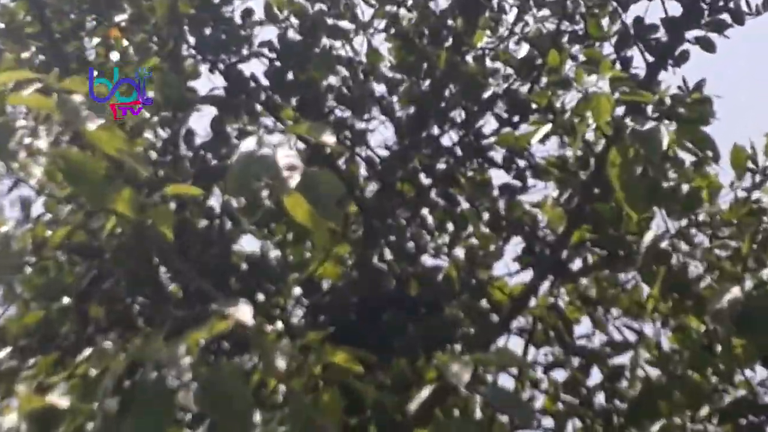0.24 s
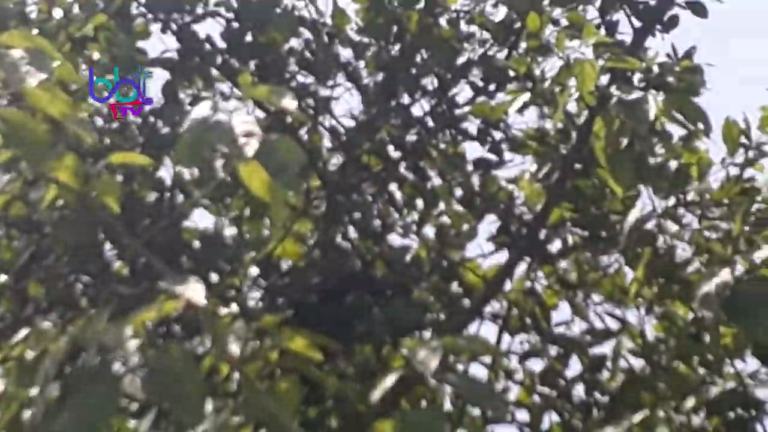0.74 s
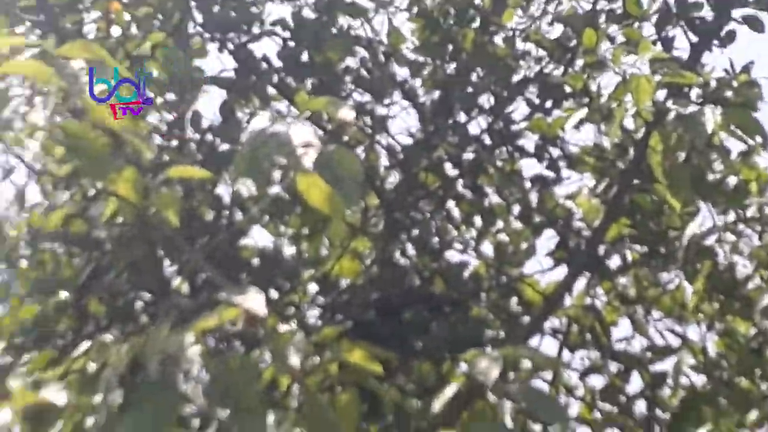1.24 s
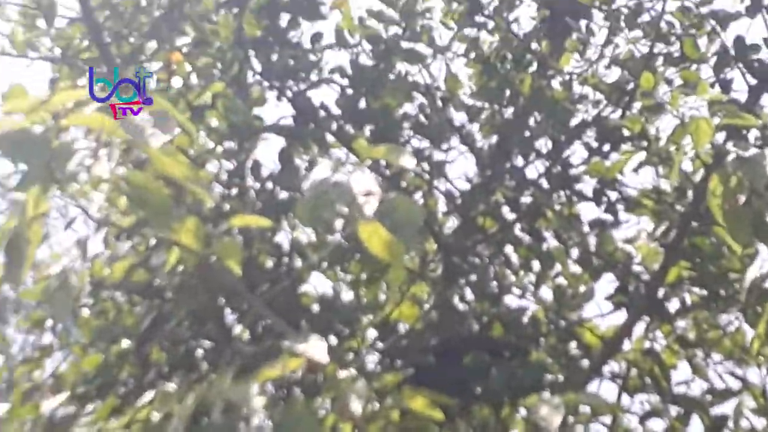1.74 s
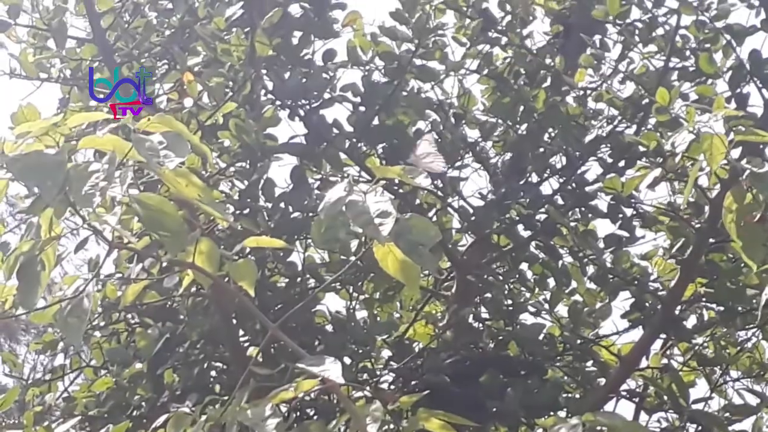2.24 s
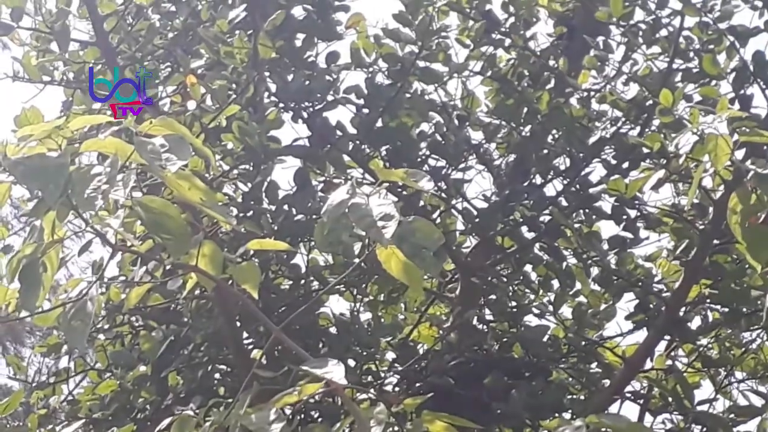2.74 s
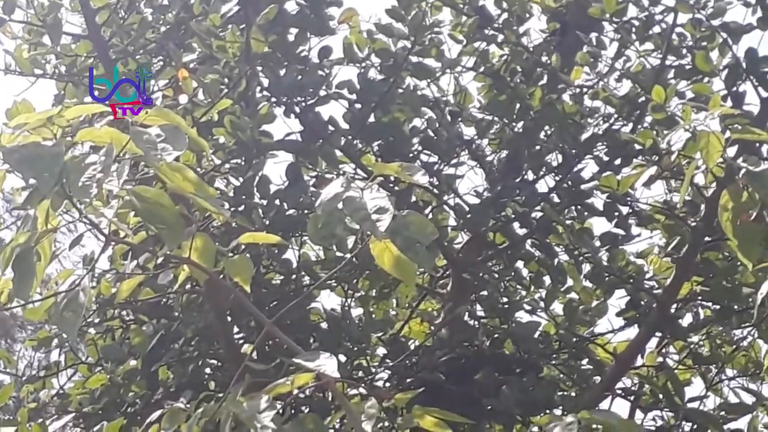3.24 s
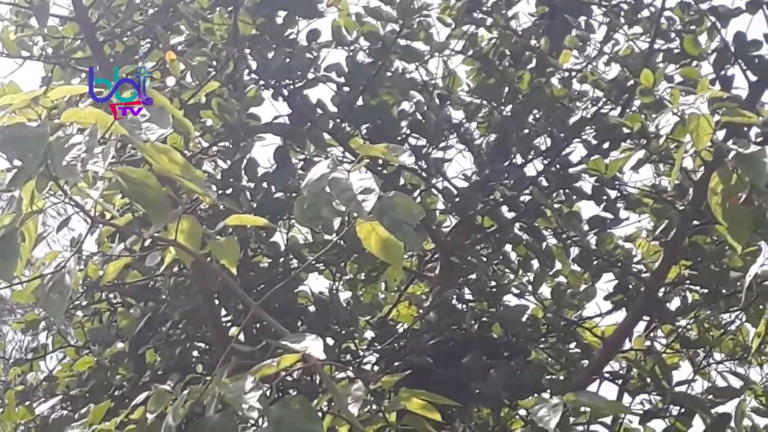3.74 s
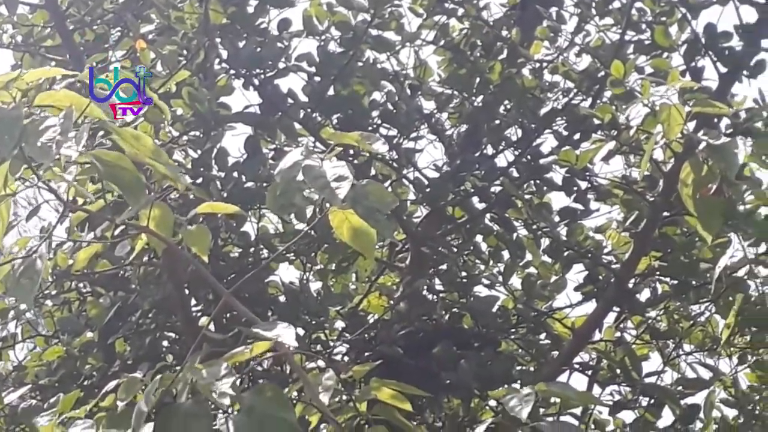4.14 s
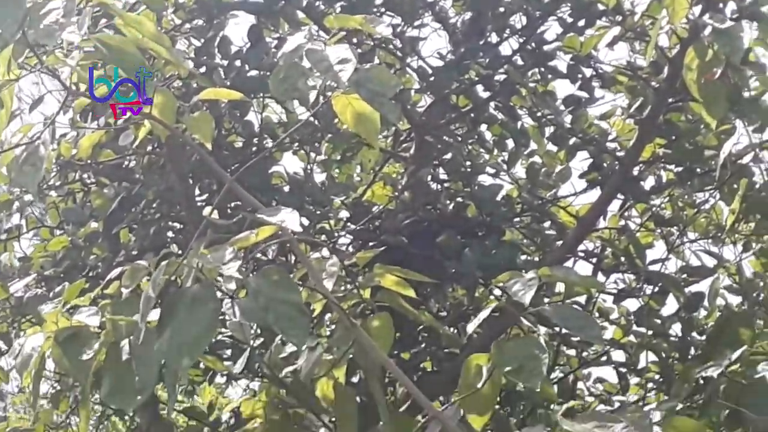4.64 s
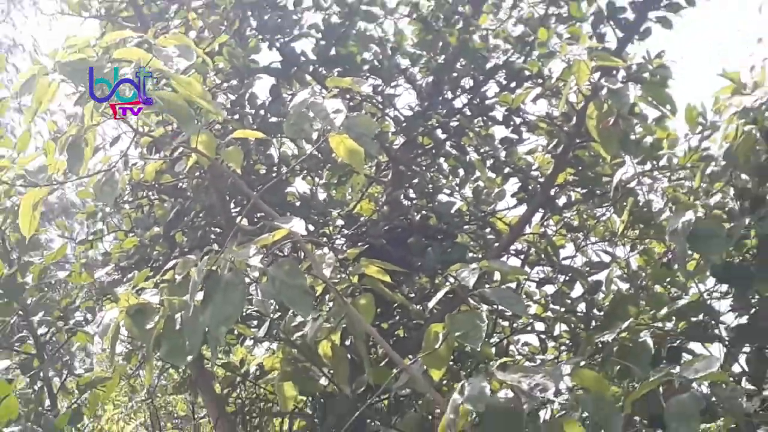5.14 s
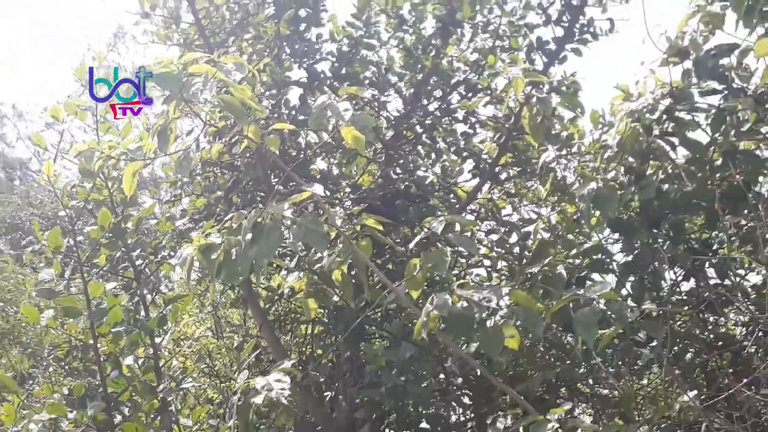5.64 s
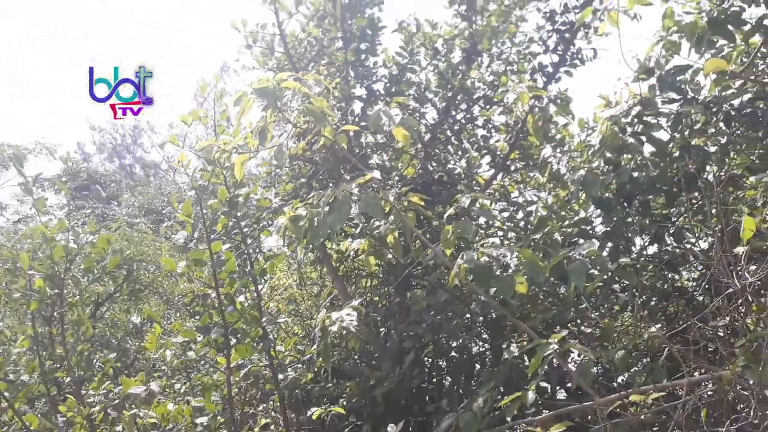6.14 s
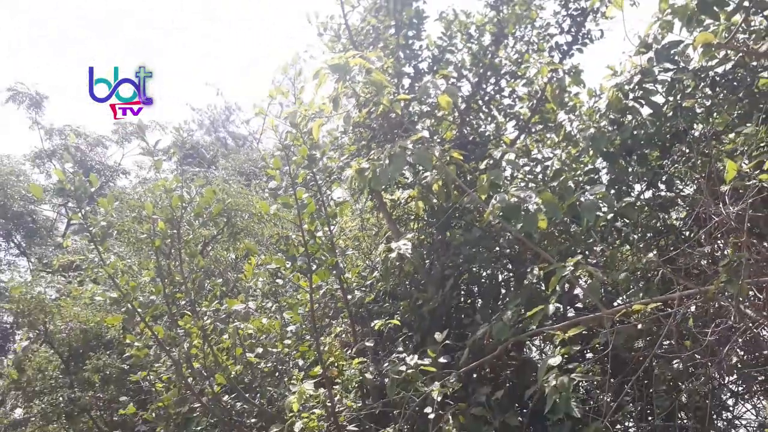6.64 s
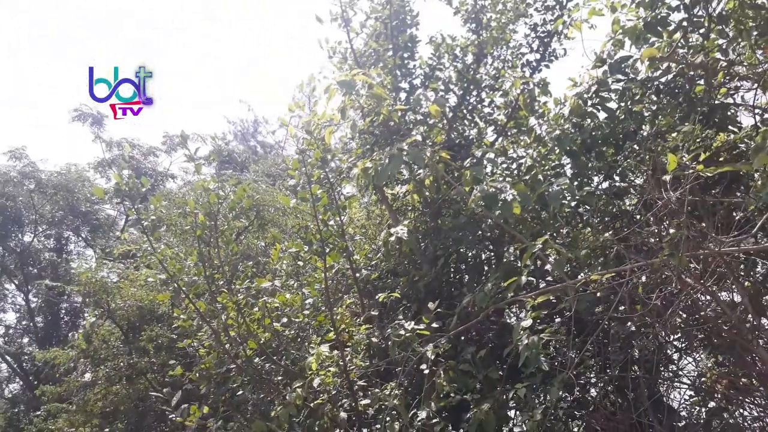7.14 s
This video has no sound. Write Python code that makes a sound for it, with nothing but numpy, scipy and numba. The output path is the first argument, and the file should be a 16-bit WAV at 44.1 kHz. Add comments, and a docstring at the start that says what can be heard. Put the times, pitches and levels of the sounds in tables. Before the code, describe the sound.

Outdoors among trees, one fairly close bird scolds in rasping bursts of about a quarter second: four calls, a gap, three more, a gap, two, then a last one. Leaves and trunks add a short, diffuse echo. Faint dry chacks, a thin throbbing insect and hoarse distant birds fill the gaps. Near the end, fingers fumble on the hard body of the microphone device, with one very loud, sharp clack.

```python
"""Scolding shrike in a tree

A shrike gives ten rasping calls in short runs: a buzzing voice shaped by throat, mouth, windpipe and beak.
Trees and a far slope answer as a noise tail and a smeared echo. Chacks, hoarse far birds and insects
are shaped noise and tones; rumble and leaf hiss are bands of noise that swell.
A hand shifts on a hard shell: knocks ring it, and rubbing is a crowd of tiny knocks."""
import sys
import numpy as np
from scipy import signal
from scipy.io import wavfile
from scipy.ndimage import uniform_filter1d
from numba import njit

SR = 44100
rng = np.random.default_rng(int(sys.argv[2]) if len(sys.argv) > 2 else 0)


def generate_wav(sig):
    """Save sig (samples, or channels by samples) to the path in sys.argv[1] as 16-bit PCM at SR."""
    pcm = np.round(np.clip(np.atleast_2d(sig).T, -1, 1) * 32767).astype(np.int16)
    wavfile.write(sys.argv[1], SR, pcm)


N = 326781


def amp(db):
    """Gain of a level in dB."""
    return 10 ** (np.asarray(db) / 20)


def rms_one(x):
    """Scale a sound to an average strength (rms) of 1."""
    return x / np.sqrt(np.mean(x ** 2) + 1e-20)


def in_time(rows):
    """Turn table columns into curves over all samples; the first column is the time in seconds."""
    time_s, *columns = np.transpose(rows)
    return [np.interp(np.arange(N) / SR, time_s, column) for column in columns]


def sounding(tables, fade_s=0.012):
    """A gate: 1 between the first and last time of each table, with short fades, else 0."""
    t = np.arange(N) / SR
    gate = 0
    for rows in tables:
        inside_s = np.minimum(t - rows[0][0], rows[-1][0] - t)
        gate = gate + np.clip(inside_s / fade_s + 1, 0, 1)
    return gate


def wander(rate_hz):
    """A random wobble of spread 1: noise smoothed twice by a one-pole low-pass."""
    r = np.exp(-2 * np.pi * rate_hz / SR)
    noise = rng.standard_normal(N + SR)
    return rms_one(signal.lfilter([1], [1, -2 * r, r * r], noise)[SR:])  # skip the filter's start


def band(x, lo_hz, hi_hz):
    """Keep the sound between two frequencies (Butterworth band-pass)."""
    return signal.sosfilt(signal.butter(2, [lo_hz, hi_hz], "band", fs=SR, output="sos"), x)


@njit
def resonate(x, turn, r):
    """Two-pole resonance, gain 1 on top; its centre (radians per sample) may move."""
    y = np.zeros(len(x))
    for i in range(2, len(x)):
        drive = (1 - r * r) / 2 * (x[i] - x[i - 2])
        y[i] = drive + 2 * r * np.cos(turn[i]) * y[i - 1] - r * r * y[i - 2]
    return y


def peak(x, hz, width_hz):
    """Resonance at hz, a number or a curve."""
    turn = 2 * np.pi * hz / SR * np.ones(N)
    return resonate(x + 1e-18, turn, np.exp(-np.pi * width_hz / SR))


def tract(x, modes, scale=1):
    """Side-by-side resonances, each passed twice to be steep; scale turns the first column into Hz."""
    out = 0
    for place, width_hz, level_db in modes:
        hz = scale * place
        out = out + amp(level_db) * peak(peak(x, hz, width_hz), hz, width_hz)
    return out


def scold_rows(start_s, length_s, crest_db, swell_db, half_db, open_hz, crest_hz, *beak):
    """One call as rows (time s, level dB, throat Hz, climb 0-1, beak columns): it opens, swells, breaks off."""
    open_s, open_db = 0.019, 9.5  # opens this fast, from this far below
    break_s, break_db, break_treble_db = 0.019, 16.5, 12  # the voice breaks off; its treble drops less
    fade_s, fade_db = 0.021, 6.5  # then it fades
    crest_s = start_s + length_s
    opened_s, opened_climb = start_s + open_s, open_s / length_s
    half_s, half_hz = (opened_s + crest_s) / 2, (open_hz + crest_hz) / 2
    broken = (*beak[:-1], beak[-1] + break_treble_db)
    return [(start_s, crest_db - swell_db - open_db, open_hz, 0, *beak),
            (opened_s, crest_db - swell_db, open_hz, opened_climb, *beak),
            (half_s, crest_db - half_db, half_hz, (1 + opened_climb) / 2, *beak),
            (crest_s, crest_db, crest_hz, 1, *beak),
            (crest_s + break_s, crest_db - break_db, crest_hz, 1, *broken),
            (crest_s + break_s + fade_s, crest_db - break_db - fade_db, crest_hz, 1, *broken)]


def shrike():
    """A pulsing voice near 900 Hz whose pitch and strength swing about 110 times a second: the rasp."""
    # scolding calls; the last four columns change as the beak turns: (start_s, length_to_crest_s, crest_db,
    # swell_from_opening_to_crest_db, still_to_swell_half_way_db, throat_at_opening_hz, throat_at_crest_hz,
    # mouth_hz, mouth_relative_db, windpipe_relative_db, treble_relative_db)
    scold_list = [(-0.08, 0.23, -43, 10, 3, 4500, 4840, 7030, -7.5, -11, -16.5),
                  (0.299, 0.23, -39.5, 8.5, 4, 4630, 4710, 7030, -9.5, -10, -22),
                  (0.666, 0.21, -30, 14, 6.5, 4500, 4770, 6670, -8, -12.5, -26),
                  (1.013, 0.19, -33.5, 8, 3.5, 4480, 4370, 6050, -8.5, -11.5, -26),
                  (2.196, .22, -30, 13, 1.5, 4260, 4340, 6400, -12, -11.5, -26.5),
                  (2.576, 0.2, -31.5, 12, 5, 4200, 4300, 6400, -9.5, -10, -25.5),
                  (2.929, .184, -30.5, 13.5, 4.5, 4237, 4350, 6610, -11, -11, -24.5),
                  (4.232, 0.22, -33.5, 10.5, 4, 4030, 4266, 6140, -11, -7.5, -25.5),
                  (4.618, 0.21, -32.5, 14, 5, 3930, 4500, 6430, -12, -9, -28.5),
                  (5.882, 0.21, -29.5, 12.5, 3.5, 4390, 4282, 6006, -10.5, -10.5, -35.5)]
    # resonances that move with the throat: (share_of_throat_hz, width_of_each_pass_hz, relative_db)
    throat_modes = [(0.982, 773, 0.52), (1.116, 895, -41)]
    # lower resonances, placed as at mid-call: (pitch_hz, width_of_each_pass_hz, relative_db)
    windpipe_modes = [(890, 230, -21.5), (1895, 750, -18), (2685, 994, 0.5)]
    # treble resonances of the beak: (pitch_hz, width_of_each_pass_hz, relative_db)
    beak_modes = [(8300, 1500, -6), (10900, 1600, 0), (13800, 3500, -7)]
    pitch_start_hz, pitch_end_hz = 800, 990  # the voice climbs through every call
    warble_start_hz, warble_end_hz = 102.17, 115.6  # the warble quickens with it
    warble_depth, pitch_jitter, pitch_drift = 0.14, 0.016, 0.012  # shares of the pitch
    warble_db, onset_swing_db = 2.5, 5  # extra swing at first: separate pulses before the running rasp
    breath = 0.3  # noise beside pulses of strength 1
    mouth_width_hz = 1330  # of each pass
    windpipe_rise = 0.28  # share by which the windpipe resonances climb from climb 0 to 1
    # throat, mouth and windpipe together pass little above this; the beak's treble is separate
    voice_top_hz = 7400

    calls = [scold_rows(*call) for call in scold_list]
    curves = in_time(np.concatenate(calls))
    level_db, throat_hz, climb, mouth_hz, mouth_db, windpipe_db, treble_db = curves

    warble_hz = warble_start_hz + (warble_end_hz - warble_start_hz) * climb
    warble_hz = warble_hz * (1 + 0.03 * wander(40))
    swing = np.sin(2 * np.pi * np.cumsum(warble_hz) / SR)
    pitch_hz = pitch_start_hz + (pitch_end_hz - pitch_start_hz) * climb
    pitch_hz = pitch_hz * (1 + warble_depth * swing + pitch_jitter * wander(264.0) + pitch_drift * wander(5.0))
    phase = 2 * np.pi * np.cumsum(pitch_hz) / SR
    pulses = rms_one(sum(np.cos(k * phase) for k in range(1, 17)))  # 16 partials make a pulse train
    swing_db = (warble_db + onset_swing_db * (1 - climb) ** 2) * swing
    source = amp(swing_db) * (pulses + breath * rng.standard_normal(N))

    voice = tract(source, throat_modes, scale=throat_hz)
    voice = voice + tract(source, [(mouth_hz, mouth_width_hz, mouth_db)])
    windpipe_scale = 1 + windpipe_rise * (climb - 0.5)
    voice = voice + amp(windpipe_db) * tract(source, windpipe_modes, scale=windpipe_scale)
    voice = signal.sosfilt(signal.butter(6, voice_top_hz, fs=SR, output="sos"), voice)
    treble = tract(source, beak_modes)
    # even out the running strength, so that the level curves alone set the loudness
    voice = voice / np.sqrt(uniform_filter1d(voice ** 2, size=1600))
    treble = treble / np.sqrt(uniform_filter1d(treble ** 2, size=1600))
    return amp(level_db) * sounding(calls) * (voice + amp(treble_db) * treble)


def chacks():
    """Far chacks: bursts of noise that die quickly, through a small throat."""
    # far chacks: (start_s, level_db)
    chack_list = [(0.583, -61), (1.322, -64), (1.3724, -64.5), (1.5544, -63), (1.8, -63.5), (3.19, -58.5),
                  (3.5963, -58.5), (4.1366, -61)]
    # each is a double burst: (delay_s, relative_db, time_to_fall_60_db_s)
    burst_pair = [(0, 7, 0.045), (0.0165, 4, 0.35)]
    # small throat: (pitch_hz, width_of_each_pass_hz, relative_db)
    small_throat = [(2570, 490, -6), (3240, 300, -3.5), (4160, 450, 0)]
    t = np.arange(N) / SR
    shape = np.zeros(N)
    for start_s, level_db in chack_list:
        for delay_s, burst_db, t60_s in burst_pair:
            age_s = t - start_s - delay_s
            fall_db = 60 * np.maximum(age_s, 0) / t60_s
            shape += (t >= start_s + delay_s) * amp(level_db + burst_db - fall_db)
    return shape * rms_one(tract(rng.standard_normal(N), small_throat))


def trees(x):
    """Scattering by trunks and leaves as a dying noise tail, and one smeared echo from a far slope."""
    tail_t60_s, tail_db = 0.29, -13.5
    slope_s, slope_db = 0.1905, -27
    t = np.arange(SR // 2) / SR
    # the square roots offset the length of each noise stretch
    tail = amp(tail_db) * amp(-60 * t / tail_t60_s) * np.sqrt(14 / tail_t60_s / SR)
    slope = amp(slope_db) * np.exp(-((t - slope_s) / 0.012) ** 2) * np.sqrt(40 / SR)
    echo = band((tail + slope) * rng.standard_normal(len(t)), 810, 11000)
    return signal.fftconvolve(x, echo)[:N]


def clicks(times, dbs):
    """One sample of the given level at each time."""
    out = np.zeros(N)
    out[np.round(np.asarray(times) * SR).astype(int)] = amp(dbs)
    return out


def struck(response, times, dbs):
    """Clicks through a response, scaled so that each on its own peaks at its level."""
    single = response(clicks([0], [0]))
    return response(clicks(times, dbs)) / np.abs(single).max()


def shell(blows):
    """The damped modes of the hard shell; each starts at full swing, then a band-pass trims them."""
    # shell modes: (pitch_hz, relative_db, time_to_fall_60_db_s)
    shell_modes = [(153, 22.5, 0.031), (278, 29.5, 0.0089), (556, -16.5, 0.015)]
    out = 0
    for hz, level_db, t60_s in shell_modes:
        r = amp(-60 / (t60_s * SR))
        c = r * np.cos(2 * np.pi * hz / SR)
        out = out + amp(level_db) * signal.lfilter([1, -c], [1, -2 * c, r * r], blows + 1e-18)
    return band(band(out, 40, 1900), 200, 1700)


def handling():
    """Knocks ring the shell and add a snap and a tick; rubbing is a dense, uneven run of small knocks."""
    # knocks and ticks on the shell: (start_s, thud_peak_db, snap_peak_db, treble_tick_peak_db)
    knock_list = [(0.948, -68, -30, -66), (1.6724, -57, -55, -56), (3.322, -53.5, -54, -59),
                  (3.915, -50.5, -42.5, -70), (4.5804, -43.5, -43, -55), (4.9086, -50.5, -38.5, -50),
                  (5.0208, -52, -43, -44), (5.086, -49, -32, -31.5), (5.1336, -37.5, -38, -37),
                  (6.3599, -40, -61, -56), (6.389, -35, -56, -74), (6.4591, -33, -49, -49),
                  (6.5055, -34.5, -62, -67), (6.5156, -37, -59, -75), (6.569, -50, -53, -66),
                  (6.612, -40.5, -60, -69), (6.6462, -36, -38.5, -63), (6.6936, -40.5, -50, -66),
                  (6.7746, -11, -52.5, -51), (6.7799, -8.5, -11, -46), (6.8839, -42, -60, -72),
                  (7.3799, -52, -68, -66.5)]
    # fingers rubbing the shell: (start_s, length_s, thud_db, scratch_db)
    rub_list = [(0.95, .014, -56.5, -50.5), (5.026, 0.021, -57.5, -60), (6.435, 0.033, -50.5, -76),
                (6.736, 0.05, -42, -46), (6.805, .012, -57, -59), (6.831, 0.024, -51, -54.5),
                (6.868, 0.014, -54, -58), (6.898, 0.057, -48, -50), (6.959, 0.076, -54, -61)]
    grains_per_s = 350  # before the clumping
    clump_db, spread_db = 5, 4  # unevenness of the crowding; scale of the random grain strength
    start_s, thud_db, snap_db, tick_db = np.transpose(knock_list)
    thuds = struck(shell, start_s, thud_db)
    snaps = struck(lambda x: band(band(x, 1400, 5300), 1500, 5000), start_s, snap_db)
    ticks = struck(lambda x: band(x, 11000, 14500), start_s, tick_db)

    strokes = [[(start, *dbs), (start + length, *dbs)] for start, length, *dbs in rub_list]
    rub_db, scratch_db = in_time(np.concatenate(strokes))
    chance = grains_per_s * amp(clump_db * wander(25)) / SR
    hits = rng.random(N) < chance
    strength = amp(spread_db * np.minimum(rng.exponential(1, N), 4))
    grains = hits * strength * rng.choice([-1, 1], N)
    scratch = band(band(grains, 1440, 2800), 530, 5200)
    rub = amp(rub_db) * rms_one(shell(grains)) + amp(scratch_db) * rms_one(scratch)
    return thuds + snaps + ticks + sounding(strokes, fade_s=0.0098) * rub


def far_birds():
    """Hoarse notes of three partials, blurred by distance into narrow bands that linger; chatter behind."""
    # hoarse notes: (start_s, length_s, second_partial_hz, its_glide_hz, its_level_db, voice_name)
    note_list = [(3.425, 0.21, 5740, -500, -66.5, "thin"), (3.775, 0.27, 4880, 10, -70, "thin"),
                 (5.08, 0.07, 4320, -100, -51, "full"), (5.197, 0.082, 4220, 105, -64, "full"),
                 (5.369, 0.048, 4450, -150, -54, "full"), (5.466, 0.109, 4270, 108, -58, "full"),
                 (5.549, 0.098, 3540, 105, -56.5, "high"), (5.675, 0.12, 3644, 108, -59.5, "high"),
                 (6.18, 0.1, 4235, 598, -58, "full"), (6.349, 0.035, 4260, 103, -55, "full"),
                 (6.387, 0.061, 4950, 199, -53, "full"), (6.54, 0.054, 4260, 48, -54, "full"),
                 (6.715, 0.028, 4400, 1, -51, "full"), (6.859, 0.072, 4650, 142, -61.5, "full"),
                 (6.86, 0.2, 3140, 78, -65, "thin"), (7.017, 0.026, 4920, -2, -63, "full"),
                 (7.17, 0.1, 4850, 106, -63, "full"), (7.357, 0.043, 5350, -16, -64, "full")]
    # by voice name: (first_partial_relative_db, third_partial_relative_db)
    voice_kinds = {"thin": (-38, -36), "full": (-7, -25), "high": (-35, -5.5)}
    # level points of a flock further off: (time_s, level_db)
    chatter_points = [(5.06, -61), (5.522, -56), (5.86, -67.5)]
    hoarse_hz, t60_s, rasp_db = 170, 0.4, 1.5  # smear of the second partial, ring, flutter
    out = np.zeros(N)
    t = np.arange(SR // 2) / SR
    for start_s, length_s, hz, glide_hz, level_db, voice in note_list:
        first_db, third_db = voice_kinds[voice]
        fall_db = 60 * np.maximum(t - length_s, 0) / t60_s
        shape = np.minimum(t / 0.028, 1) * amp(level_db - fall_db)
        phase = 2 * np.pi * np.cumsum(hz + glide_hz * np.minimum(t / length_s, 1)) / SR
        start = round(start_s * SR)
        # share: pitch of each partial beside the second
        for share, relative_db in ((0.5, first_db), (1, 0), (1.5, third_db)):
            blur = signal.butter(2, share * hoarse_hz, fs=SR, output="sos")
            a, b = signal.sosfilt(blur, rng.standard_normal((2, len(t))))  # slow noise smears the partial
            narrow = rms_one(a * np.cos(share * phase) + b * np.sin(share * phase))
            out[start:start + len(t)] += (amp(relative_db) * shape * narrow)[:N - start]
    chatter_db, = in_time(chatter_points)
    wash = rms_one(band(rng.standard_normal(N), 2380, 4500)) * amp(chatter_db + 1.7 * wander(36))
    return out * amp(rasp_db * wander(73)) + sounding([chatter_points], fade_s=0.013) * wash


def insect():
    """Throbbing wing scraping, a rough tone with noise, in one narrow resonance."""
    # points of the level and pitch curves: (time_s, level_db, pitch_hz)
    insect_points = [(2.2, -80, 7250), (3.05, -71, 7350), (3.45, -68, 7540), (5.2, -66, 7540),
                     (5.41, -67, 7540), (5.45, -78, 7540)]
    width_hz, throbs_hz = 280, 76
    level_db, hz = in_time(insect_points)
    throb_phase = 2 * np.pi * np.cumsum(throbs_hz * (1 + 0.033 * wander(1.9))) / SR
    throb = np.maximum(np.sin(throb_phase) + 0.92, 0)
    tone = np.sin(2 * np.pi * np.cumsum(hz + 35 * wander(62)) / SR)
    scrape = throb * (tone + 2.3 * wander(9000))
    return amp(level_db) * sounding([insect_points], fade_s=0.03) * rms_one(peak(scrape, hz, width_hz))


def chorus():
    """Many far insects merge into faint narrow bands of hiss that waver."""
    # far insects: (pitch_hz, width_of_each_pass_hz, level_db)
    hiss_bands = [(5870, 170, -85), (7220, 96, -80.5)]
    out = 0
    for hz, width_hz, level_db in hiss_bands:
        level = amp(level_db + 2 * wander(1.0))
        hiss = peak(peak(rng.standard_normal(N), hz, width_hz), hz, width_hz)
        out = out + level * rms_one(hiss)
    return out


def air():
    """Third-octave bands of noise in three regions that swell on their own; the rumble is lumpy."""
    # tone colour, relative within each region: (pitch_hz, relative_level_db_per_hz)
    colour_points = [(15, -34), (25, -45), (70, 15), (242, 6.5), (326, 2), (560, -8), (1560, -9),
                     (2350, -12), (2990, -10), (5000, -7), (6380, -7.5), (7710, -40), (8830, -33.5),
                     (14400, -30.5), (16000, -33.5)]
    # level points: (time_s, rumble_db, leaf_hiss_db, treble_hiss_db)
    swell_points = [(0.0, -61.5, -60, -63), (0.08, -69.5, -64.5, -77), (0.65, -63.5, -61.5, -70),
                    (1.5, -70, -66, -78), (2.23, -69.5, -69.5, -82), (2.35, -67, -64.5, -69.5),
                    (4.0, -69, -65.5, -81), (6.2, -61.5, -61.5, -78), (6.44, -70.5, -62.5, -80),
                    (6.77, -56, -62.5, -76), (7.41, -69, -66.5, -89)]
    regions = np.zeros((3, N))
    edges_hz = 22 * 2 ** np.arange(0, 9.7, 1 / 3)
    white = rng.standard_normal((2, N))  # neighbouring bands take turns between two noises
    point_hz, point_db = np.transpose(colour_points)
    for k, (low_hz, high_hz) in enumerate(zip(edges_hz, edges_hz[1:])):
        hz = np.sqrt(low_hz * high_hz)
        region = int(hz > 400) + int(hz > 8000)  # rumble, leaves, treble
        colour_db = np.interp(np.log(hz), np.log(point_hz), point_db)
        regions[region] += amp(colour_db) * band(white[k % 2], low_hz, high_hz)
    rumble_db, leaves_db, treble_db = in_time(swell_points)
    rumble = amp(rumble_db + 3.0 * wander(2.7)) * rms_one(regions[0])
    return rumble + amp(leaves_db) * rms_one(regions[1]) + amp(treble_db) * rms_one(regions[2])


def scene():
    """All sources reach one microphone; shrike and chacks also by way of the ground and the trees."""
    ground_s, ground_db = 0.0043, -7  # bounce off the ground
    birds = shrike() + chacks()
    bounce = amp(ground_db) * np.roll(birds, round(ground_s * SR))
    birds = (birds + bounce) / np.hypot(1, amp(ground_db))
    mono = birds + trees(birds) + far_birds() + insect() + chorus() + handling() + air()
    return np.array([mono, mono])


def record(dry):
    """Each channel adds a trace of its own hiss; a steep low-pass cuts the top."""
    hiss_db, stop_hz = -87, 16432  # from stop_hz up, the sound is 70 dB down
    wet = dry + amp(hiss_db) * rng.standard_normal(dry.shape)
    return signal.sosfilt(signal.cheby2(12, 70, stop_hz, fs=SR, output="sos"), wet)


dry = scene()
out = record(dry)
generate_wav(out)
```